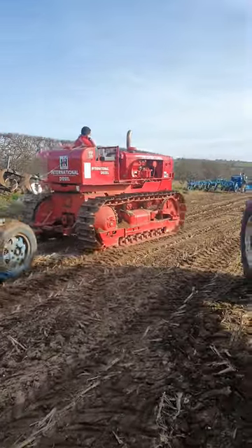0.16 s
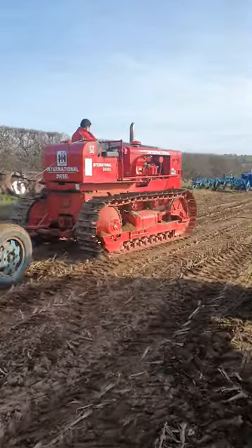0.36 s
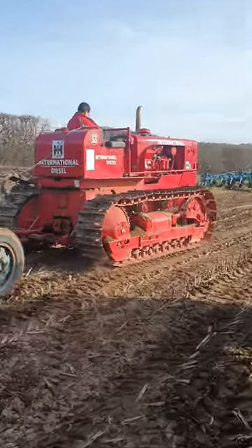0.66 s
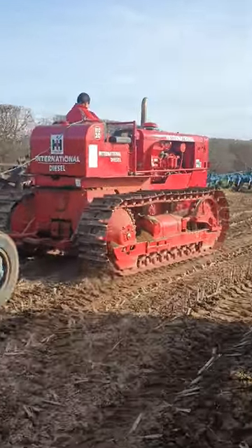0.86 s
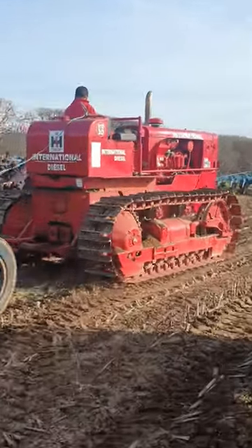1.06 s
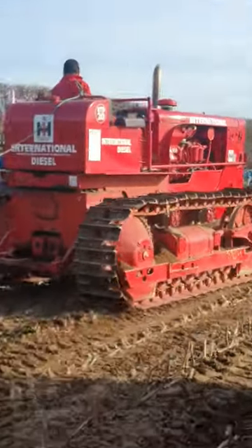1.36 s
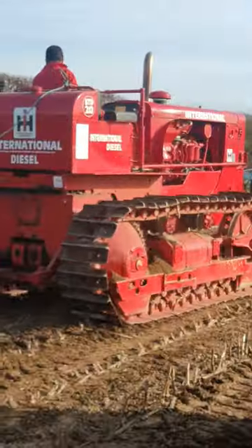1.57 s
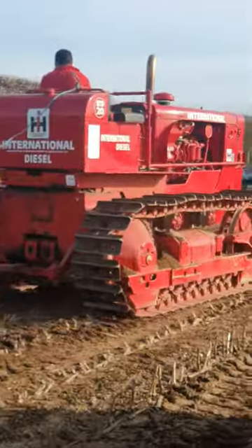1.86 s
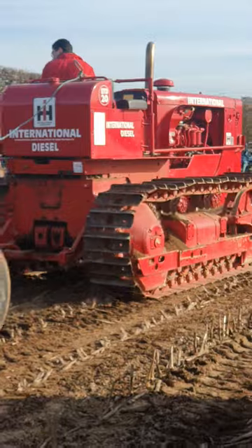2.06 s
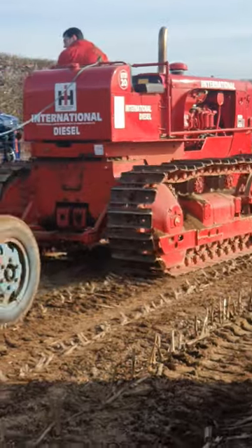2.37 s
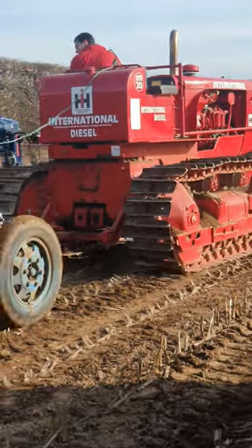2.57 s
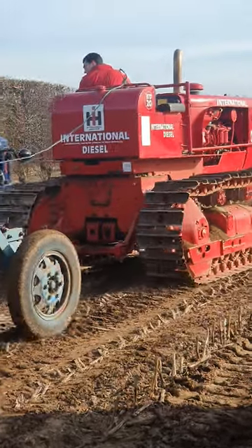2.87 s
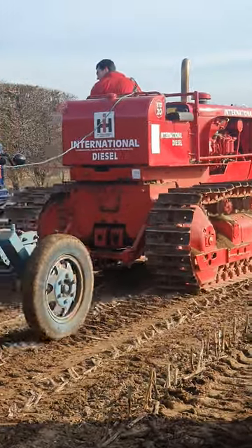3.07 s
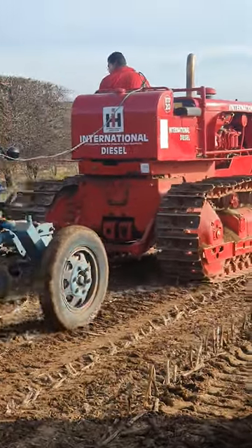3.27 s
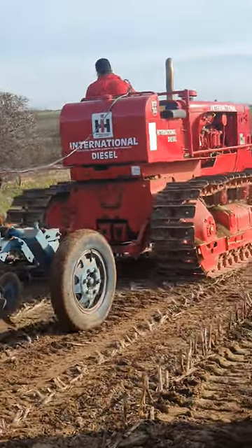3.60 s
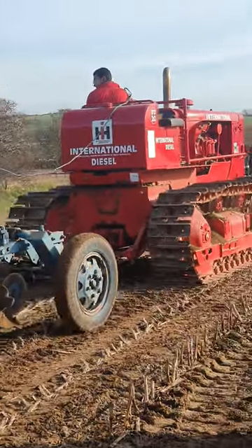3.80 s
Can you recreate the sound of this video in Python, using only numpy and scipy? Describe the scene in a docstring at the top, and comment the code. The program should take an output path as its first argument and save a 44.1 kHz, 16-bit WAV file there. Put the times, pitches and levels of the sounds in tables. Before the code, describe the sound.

Deep throbbing diesel tractor engine outdoors, with knocking clatter, a few metallic clunks and rattling track links.

```python
"""On a stubble field, a diesel crawler tractor creeps past, turns its back and eases off at the end.
Its exhaust is a wavering pitch with a few overtones, droning against other engines over a low rumble.
Its block is banded noise that swells and knocks; small blows ring metal modes as clatter, a few big ones clunk.
The steel tracks are bursts of scraping noise with tiny rings, and the squeaks are short gritty tones.
Two phone microphone ports hear it outdoors."""
import sys
import numpy as np
from scipy import signal
from scipy.fft import rfft, irfft, next_fast_len
from scipy.io import wavfile
from scipy.ndimage import uniform_filter1d, map_coordinates

SR = 44100
rng = np.random.default_rng(int(sys.argv[2]) if len(sys.argv) > 2 else 0)


def store_pcm(level_fs):
    """Save levels as 16-bit WAV."""
    pcm = np.round(np.clip(level_fs, -1, 1) * 32767).astype(np.int16)
    wavfile.write(sys.argv[1], SR, np.atleast_2d(pcm).T)


def natural_amplitude(level_db):
    """Convert a level in decibels to a linear amplitude factor, elementwise."""
    exponent = np.asarray(level_db, float) / 20
    return 10 ** exponent


N = 173754  # length in samples
T = np.arange(N) / SR  # time in seconds


def unit(x):
    """Scale to an rms of 1."""
    return x / np.sqrt(np.mean(x ** 2) + 1e-20)


def along(points, hz):
    """Read a curve of (Hz, value) points on a log frequency axis."""
    f, v = np.transpose(points)
    return np.interp(np.log(hz + 1), np.log(f + 1), v)


def curves(rows):
    """Turn each column after the time into one value per sample."""
    s, *columns = np.transpose(rows)
    return [np.interp(T, s, column) for column in columns]


def wobble(rate):
    """A smooth random curve with rate knots a second, at most 40."""
    knots = rng.standard_normal(int(N * 40 / SR) + 4)
    return map_coordinates(knots, [T * min(rate, 40)])


def filtered(x, response):
    """Shape x in the spectrum by a response, possibly complex, given as a function of frequency."""
    m = next_fast_len(N + 8192)
    return irfft(rfft(x, m) * response(np.fft.rfftfreq(m, 1 / SR)), m)[..., :N]


def patchy(patchy_db):
    """Two white noises sharing random patches of gain over time and frequency."""
    z = signal.stft(rng.standard_normal((2, N)), nperseg=512)[2]
    field = uniform_filter1d(rng.standard_normal(z.shape[1:]), size=5, axis=0)
    field = unit(uniform_filter1d(field, size=8, axis=1))
    return signal.istft(z * natural_amplitude(patchy_db * field), nperseg=512)[1][:, :N]


def swell_and_fade(u, peak_s):
    """An envelope that starts at 0, reaches 1 after peak_s and dies away."""
    return u / peak_s * np.exp(1 - u / peak_s)


# How alike the two ports hear wide sounds. Each row: frequency in Hz, likeness from 0 to 1.
LIKENESS = [(60, 0.75), (130, 1), (290, 0.91), (640, 0.98), (1200, 0.82), (2400, 0.66), (5000, 0.24),
            (9000, 0.18), (14000, .45)]


def diffuse(pair):
    """Mix two unrelated signals into left and right so that they are as alike as the table says."""
    turn = lambda hz: np.arccos(np.clip(along(LIKENESS, hz), 0, 1)) / 2
    mid, side = filtered(pair, lambda hz: np.array([np.cos(turn(hz)), np.sin(turn(hz))]))
    return np.array([mid + side, mid - side])


def cycles(track):
    """Count the cycles of a note elapsed so far by adding up its pitch."""
    return np.cumsum(curves(track)[0]) / SR


def engine_note(track, orders, first_s):
    """A pitch with its orders (multiples); higher orders waver more in level and flutter in phase."""
    unsteady_db = 0.4
    level_db = curves(track)[1]
    cycle = cycles(track) - first_s * track[0][1]  # first pressure peak at first_s
    out = np.zeros(N)
    for k, db in orders:
        level = natural_amplitude(level_db + db + unsteady_db * np.sqrt(k) * wobble(7))
        flutter = 0.33 * (k - 1) * wobble(4.11)
        out += np.sqrt(2) * level * np.cos(2 * np.pi * k * cycle + flutter)
    return out


# Colour of the low rumble. Each row: frequency in Hz, relative level in dB per Hz.
RUMBLE_COLOUR = [(15, -30), (28, -3), (38, 0), (48, 2), (60, 1), (68, 3), (90, -3), (110, -12), (135, -9),
                 (160, -40)]


def rumble():
    """A steady bed of random noise kept below 160 Hz."""
    colour = lambda hz: natural_amplitude(along(RUMBLE_COLOUR, hz)) * (hz < 160)
    return natural_amplitude(-34) * unit(filtered(rng.standard_normal(N), colour))


# Loose drones. Each row: pitch in Hz, level in dB, pitch wavering in Hz, level wavering in dB.
LOOSE_DRONES = [(33, -42, .05, .5), (66, -33, .6, 3), (68.6, -34, .6, 3), (103.7, -30, .25, 1.5),
                (115, -40, .8, 3), (252, -38, 3, 3), (568, -41, 6, 3)]


def loose_drones():
    """Single tones whose pitch and loudness waver at random."""
    out = np.zeros(N)
    for hz, db, waver_hz, waver_db in LOOSE_DRONES:
        level = natural_amplitude(db + waver_db * wobble(3.84))
        cycle = np.cumsum(hz + waver_hz * wobble(3)) / SR
        out += np.sqrt(2) * level * np.sin(2 * np.pi * cycle)
    return out


# Note of a third engine. Each row: time in seconds, pitch in Hz, level in dB before the orders' own.
THIRD_NOTE = [(0.0, 83.58, -24.5), (0.44, 83.06, -25.0), (0.88, 83.71, -24.4), (1.31, 83.37, -24.9),
              (1.75, 83.01, -25.1), (2.19, 84.27, -26.1), (2.63, 83.81, -24.0), (3.06, 84.03, -22.5),
              (3.5, 83.71, -22.5), (3.94, 84.01, -23.4)]
# Its orders. Each row: multiple of the pitch, dB added to the level.
THIRD_NOTE_ORDERS = [(1, 1.5), (.5, -22), (2, -17)]


def third_engine():
    """The drone of another engine nearby, with a half order below its pitch."""
    return engine_note(THIRD_NOTE, THIRD_NOTE_ORDERS, first_s=.0012)


# Note of a second engine. Each row: time in seconds, pitch in Hz, level in dB before the orders' own.
SECOND_NOTE = [(0.0, 48.52, -21.3), (0.49, 48.95, -22.0), (0.98, 48.91, -21.9), (1.48, 49.58, -23.2),
               (1.97, 49.91, -22.5), (2.46, 50.22, -20.9), (2.96, 50.01, -23.2), (3.45, 50.26, -23.4),
               (3.94, 48.9, -22.4)]
# Its orders. Each row: multiple of the pitch, dB added to the level.
SECOND_NOTE_ORDERS = [(1, 0.5), (2, -9.5), (3, -27.5), (4, -23), (5, -24.5)]


def second_engine():
    """The deepest of the three engine notes, with its multiples above."""
    return engine_note(SECOND_NOTE, SECOND_NOTE_ORDERS, first_s=.0202)


# Metal modes of valve gear and rollers. Each row: pitch in Hz, level in dB, time to the ring's peak in seconds.
CLATTER_RINGS = [(582, -1.5, 0.0041), (755, -1.5, 0.0041), (1051, -8, 0.0058), (1593, -3.5, 0.0043)]
# Loudness. Each row: time in seconds, level in dB before a trim, extra dB for the top mode's rasp.
CLATTER_LEVEL = [(0, -40, -6), (1.4, -38.5, -2), (2.4, -38.5, -5.5), (3, -37, 12), (3.94, -45, 0)]


def clatter():
    """Uneven small blows of valve gear and rollers, each ringing every mode with its own strength."""
    blows_per_s, scatter_db, trim_db = 45, 4, -2.5
    level_db, rasp_db = curves(CLATTER_LEVEL)
    hit, u = rng.random(N) < blows_per_s / SR, T[:2000]
    rings = []
    for hz, db, peak_s in CLATTER_RINGS:
        blows = hit * natural_amplitude(scatter_db * rng.standard_normal((2, N)).clip(-2, 2))
        ring = np.sin(2 * np.pi * hz * u) * swell_and_fade(u, peak_s)
        rings.append(natural_amplitude(db) * signal.fftconvolve(blows, [ring], axes=1)[:, :N])
    mix = diffuse(sum(rings[:-1]) + natural_amplitude(rasp_db) * rings[-1])
    return natural_amplitude(level_db + trim_db) * mix / np.std(sum(rings))


# Dull clunks of the running gear. Each row: start in seconds, level in dB, pitch in Hz.
CLUNK_BLOWS = [(.169, -18, 556), (.5175, -12.5, 720), (.8855, -11, 570), (2.554, -16.5, 670),
               (2.764, -19, 700)]


def clunks():
    """Heavy steel meets steel: a few damped cycles of two modes and a dull crack of noise."""
    peak_s, overtone, crack_db = .002, 1.3, -9
    crack = unit(filtered(rng.standard_normal(N), lambda hz: (hz > 900) & (hz < 3300)))
    out = np.zeros(N)
    for s, db, hz in CLUNK_BLOWS:
        u = np.clip(T - s, 0, None)
        ring = np.sin(2 * np.pi * hz * u) + 0.35 * np.sin(2 * np.pi * overtone * hz * u)
        out += natural_amplitude(db) * swell_and_fade(u, peak_s) * (ring + natural_amplitude(crack_db) * crack)
    return out


# Squeaks and pings of the track pins.
# Each row: middle in seconds, pitch in Hz, peak level in dB before the grit, half length in seconds.
PIN_SQUEAKS = [(0.248, 5540, -34, .003), (.66, 10200, -42, .005), (.09, 9450, -44, 0.004),
               (0.27, 5500, -32, 0.0084), (.261, 6500, -40, .004), (.273, 8100, -42, 0.0035),
               (.275, 12450, -40, .008), (.301, 12500, -41, .004), (0.286, 12600, -34, 0.0053),
               (0.4, 11030, -42, .005), (0.42, 7850, -39, .006), (0.508, 3150, -43, 0.0053),
               (.458, 3690, -30.5, 0.012), (.815, 13100, -44, .01), (0.817, 10340, -43, .01),
               (0.837, 8700, -40, 0.0043), (.838, 5300, -38, .005), (0.993, 13530, -45, .012),
               (1.12, 5950, -37, 0.0035), (1.148, 10400, -42, .005), (1.355, 15500, -49, .007),
               (1.928, 3090, -28.5, 0.016), (2.917, 10200, -45, .004), (2.51, 5150, -47, 0.013),
               (2.62, 5340, -39, .015), (3.26, 3050, -34, .012), (3.799, 12600, -44, .004),
               (3.878, 12900, -47, .012), (3.891, 5400, -43, 0.016)]


def squeaks():
    """Short tones that swell and fade, roughened by slow noise on their strength and phase."""
    slow = uniform_filter1d(uniform_filter1d(rng.standard_normal((2, N)), size=90), size=90)
    grit = 1 + .3 * unit(slow[0]) + .35j * unit(slow[1])
    out = np.zeros(N)
    for s, hz, db, half_s in PIN_SQUEAKS:
        tone = np.real(grit * np.exp(2j * np.pi * hz * T))
        out += natural_amplitude(db) * np.exp(-((T - s) / half_s) ** 2) * tone
    return out


# Track links rattling. Each row: start in seconds, length in seconds, level in dB,
# brightness in dB (treble against the rest).
LINK_RATTLES = [(0, .03, -36, -2.5), (0.08, .09, -48, 2), (0.245, 0.058, -38.5, 2),
                (0.374, .008, -36.5, -3), (0.389, .062, -37, 0), (0.549, 0.045, -42.5, 0),
                (0.697, .07, -47, -8), (0.794, 0.056, -38.5, 0), (0.955, 0.062, -42.5, 3),
                (1.112, .015, -39, 3), (1.14, 0.04, -48, 0), (1.237, 0.013, -40.5, -2),
                (1.348, 0.047, -45.5, 0), (1.481, 0.013, -51, 4), (1.583, 0.056, -46, -3),
                (1.718, 0.043, -46, 5), (1.91, 0.071, -46, 0), (1.984, 0.017, -42, -12),
                (2.082, .025, -49, 6), (2.26, 0.046, -42, -1), (2.4, .025, -46, 2), (2.513, 0.056, -45, -7),
                (2.605, .03, -46, 10), (2.651, 0.033, -42, -8), (2.8, 0.032, -46, -10),
                (2.909, 0.024, -39, -5), (3.03, 0.028, -49, 4), (3.116, 0.016, -43, -11),
                (3.18, 0.042, -45, 7), (3.23, 0.021, -45.5, -14), (3.36, 0.053, -46, -7),
                (3.508, 0.032, -49, -13), (3.6, 0.019, -61, 0), (3.652, 0.028, -52, 7),
                (3.778, 0.026, -49, 6), (3.864, 0.052, -42.5, -4)]
# Colour of the rattle. Each row: frequency in Hz, relative level in dB.
LINK_COLOUR = [(1800, -32), (3000, 5.5), (5500, 3), (7000, -7.5), (10000, -0.5), (13500, -6.5),
               (15800, -16)]


def link_colour(hz):
    """The shared rattle spectrum, empty up to 1800 Hz."""
    return natural_amplitude(along(LINK_COLOUR, hz)) * (hz > 1800)


def link_scrapes():
    """Patchy noise with random ticks; each link lets it in sharply and it dies away after the link's length."""
    tail_s = 0.005
    gain = np.zeros((2, 1, N))  # below and above 7000 Hz
    for s, length_s, db, bright_db in LINK_RATTLES:
        shape = (T >= s) * np.exp(-np.clip(T - s - length_s, 0, None) / tail_s)
        gain += natural_amplitude(db + np.array([[[-bright_db]], [[bright_db]]]) / 2) * shape
    scrape = unit(filtered(diffuse(patchy(patchy_db=4)), link_colour)) * natural_amplitude(1.5 * wobble(40))
    ticks = signal.fftconvolve(rng.random(N) < 150 / SR, np.exp(-T[:2000] / .0015))[:N]
    scrape = unit(scrape * (1 + 1.2 * ticks))
    low = filtered(scrape, lambda hz: hz < 7000)
    return gain[0] * low + gain[1] * (scrape - low)


def link_jingle():
    """Thirty tiny metal rings per link, at random moments, pitches, strengths and places left to right."""
    peak_s, jingle_db = 0.0044, -2
    rings, t = np.zeros((2, N + 2000)), T[:2000]
    for s, length_s, db, bright_db in LINK_RATTLES:
        for when, pitch, size, pan in rng.random((30, 4)):
            ring = np.sin(2 * np.pi * 3000 * 5.2 ** pitch * t) * swell_and_fade(t, peak_s)
            ring *= natural_amplitude(db + jingle_db + 4 * (size - 1.0) + bright_db * (pitch - .5))
            ring *= np.sqrt(length_s / 0.082)  # longer rattles jingle louder
            start = int((s + when * length_s) * SR)
            rings[:, start:start + 2000] += ring * [[pan], [1 - pan]]
    return filtered(rings[:, :N], link_colour)


# Roar as the machine turns away. Each row: time in seconds, then the level in dB before a trim
# of each of eight bands from bass to treble.
ROAR_BANDS = [(0.0, -27.5, -36.5, -34, -26.5, -29.5, -35.5, -35.5, -51),
              (0.32, -32, -28, -37.5, -26.5, -31, -36, -36, -49.5),
              (1.06, -27.5, -31.5, -36, -28.5, -32.5, -35.5, -36, -52.5),
              (1.47, -30.5, -28, -38, -27.5, -32, -35, -34.5, -51.5),
              (2.04, -30, -31, -37.5, -27.5, -34.5, -34, -35, -52),
              (2.6, -29, -31.5, -37.5, -29, -34.5, -34.5, -35.5, -53),
              (3.09, -28.5, -32.5, -38.5, -28.5, -34.5, -33, -35.5, -53),
              (3.52, -32, -35, -36.5, -30.5, -35, -35, -36, -53.5),
              (3.94, -29, -32.5, -39.5, -32.5, -33, -36.5, -39.5, -54)]
# Borders between those bands, seven frequencies in Hz.
ROAR_BORDERS = [200, 320, 450, 950, 1350, 1800, 6800]
# Colour of the roar within the bands. Each row: frequency in Hz, relative level in dB per Hz.
ROAR_SPECTRUM = [(90, -19), (120, 0.5), (155, 1.5), (210, -0.5), (265, -1.5), (300, -3.5), (350, -11),
                 (450, -11), (510, -3), (570, -2.5), (700, -2.5), (820, -5.5), (900, -9), (1100, -12.5),
                 (1300, -15.5), (1450, -11.5), (1640, -8), (1740, -16.5), (1850, -16.5), (2200, -22.5),
                 (2500, -21), (2700, -26), (3200, -26), (3700, -25), (4300, -31), (5500, -34), (6400, -37),
                 (7000, -43.5), (7600, -46), (9500, -41.5), (12000, -44), (15700, -52.5)]


def knocking():
    """Patchy noise let through by uneven decaying knocks, one at each slightly mistimed exhaust firing."""
    decay_s, scatter_db = .004, 2.5
    cycle = cycles(EXHAUST_NOTE) + .08 * wobble(30)
    fired = np.diff(np.floor(cycle), prepend=0) > 0
    blows = fired * natural_amplitude(scatter_db * rng.standard_normal(N))
    knocks = signal.fftconvolve(blows, np.exp(-T[:2000] / decay_s))[:N]
    return knocks * patchy(patchy_db=1.6)


def swelling():
    """Patchy noise swelling and sinking once per cycle of the second engine's note."""
    return natural_amplitude(1.0 * np.cos(2 * np.pi * cycles(SECOND_NOTE))) * patchy(patchy_db=1.63)


def roar():
    """Smooth noise low down, swelling and knocking noise higher up; each band has its own slow level."""
    knock_share, trim_db = .12, 1.0  # share of the power
    gated = np.sqrt(1 - knock_share) * unit(swelling()) + np.sqrt(knock_share) * unit(knocking())
    high = lambda hz: hz / np.hypot(hz, 900)
    low = lambda hz: np.sqrt(1 - high(hz) ** 2)
    mix = diffuse(filtered(unit(patchy(patchy_db=.5)), low) + filtered(gated, high))
    mix = filtered(mix, lambda hz: natural_amplitude(along(ROAR_SPECTRUM, hz)))
    below = [filtered(mix, lambda hz: 1 / (1 + (hz / border) ** 24)) for border in ROAR_BORDERS]
    cuts = [0 * mix] + below + [mix]
    out = np.zeros((2, N))
    for lower, upper, db in zip(cuts, cuts[1:], curves(ROAR_BANDS)):
        out += natural_amplitude(db + trim_db + 0.2 * wobble(6.7)) * unit(upper - lower)
    return out


# Exhaust note of the crawler. Each row: time in seconds, pitch in Hz, level in dB.
EXHAUST_NOTE = [(0, 76.17, -21.5), (.4, 75.6, -19), (.8, 75.8, -18.5), (1.2, 76.43, -17),
                (1.6, 75.93, -18.5), (2, 75.88, -15.5), (2.4, 75.92, -18.5), (2.8, 76.16, -18),
                (3.2, 75.72, -15.5), (3.46, 75.9, -15), (3.55, 75.3, -16), (3.8, 68, -18.5),
                (3.94, 68, -16.5)]
# Its orders. Each row: multiple of the pitch, dB added to the level.
EXHAUST_NOTE_ORDERS = [(1, 0), (2, -26), (3, -30)]


def crawler_exhaust():
    """Pressure pulses of the firing heard as a low note with weak multiples; it sags as the engine eases off."""
    return engine_note(EXHAUST_NOTE, EXHAUST_NOTE_ORDERS, first_s=.0052)


def scene():
    """Everything, before the ports."""
    nearby = rumble() + loose_drones() + third_engine() + second_engine()
    tracks = clunks() + squeaks() + link_scrapes() + link_jingle()
    return nearby + clatter() + tracks + roar() + crawler_exhaust()


def top_cut(x):
    """Nothing passes above the cut-off."""
    return signal.sosfilt(signal.butter(12, 15710, fs=SR, output="sos"), x)


# Balance of the ports. Each row: frequency in Hz, left over right in dB.
PORT_LEAN = [(60, 0), (110, -1), (200, 0), (350, -3.5), (450, 7), (600, 3.5), (850, -1), (1000, 1),
             (1400, -1.5), (1700, -7), (1850, 3.5), (2300, 5.5), (2900, 5), (3600, 5.5), (4400, 6),
             (5500, 9), (6500, 11), (7200, 6), (9000, 2), (11000, 2), (15000, 5.5)]
# Timing of the ports. Each row: frequency in Hz, radians by which the left leads.
PORT_LEAD = [(0, 0), (1380, 0.85), (1720, 2), (2500, 2.5), (2840, 4.5), (3100, 4), (3360, 5), (4050, 6.5),
             (5250, 7), (6720, 11), (8610, 11.5), (10900, 10.5), (12300, 10.0), (15200, 11.5)]
# Treble drifting as the machine turns. Each row: time in seconds, extra left over right in dB.
TREBLE_DRIFT = [(0, 0.5), (.8, -1), (1.3, 1), (1.8, -1), (2.2, 1), (2.7, -0.5), (3.2, 1), (3.94, 2)]


def record(dry):
    """Two ports: the left hears first and mostly brighter, the deepest bass is cut, the treble drifts sideways."""
    low_cut_hz, treble_hz = 35, 2400
    lead_hz, lead = np.transpose(PORT_LEAD)
    tilt = lambda hz: natural_amplitude(along(PORT_LEAN, hz) / 2) * np.exp(.5j * np.interp(hz, lead_hz, lead))
    low_cut = lambda hz: 1 / np.sqrt(1 + (low_cut_hz / (hz + 1)) ** 8)
    x = filtered(dry, lambda hz: np.array([tilt(hz), 1 / tilt(hz)]) * low_cut(hz))
    treble = filtered(x, lambda hz: 1 / (1 + (treble_hz / (hz + 1)) ** 8))
    drift_db = np.outer([.3, -.7], curves(TREBLE_DRIFT)[0])  # left and right shares
    return top_cut(x + treble * (natural_amplitude(drift_db) - 1))


dry = scene()
out = record(dry)
store_pcm(out)
```